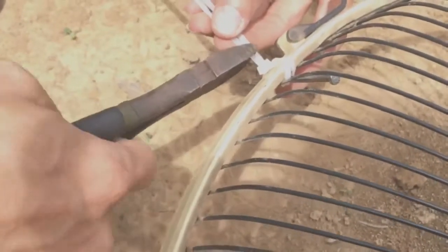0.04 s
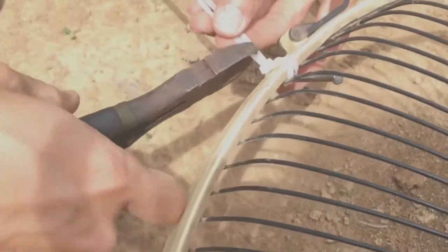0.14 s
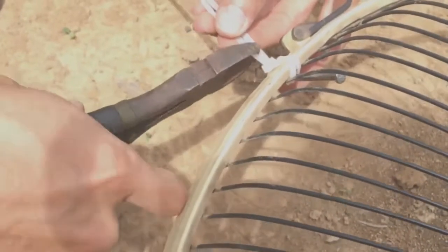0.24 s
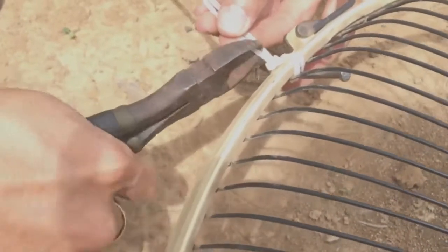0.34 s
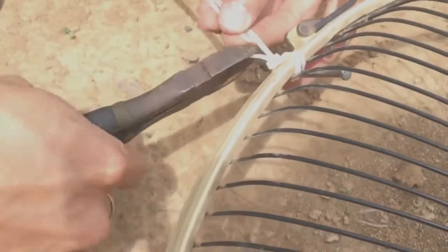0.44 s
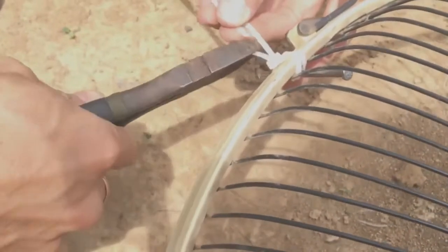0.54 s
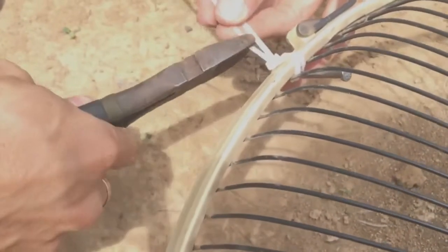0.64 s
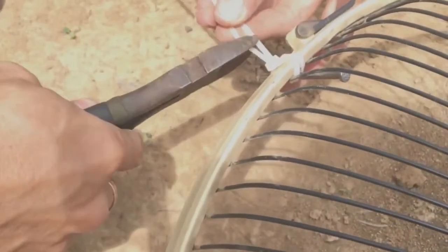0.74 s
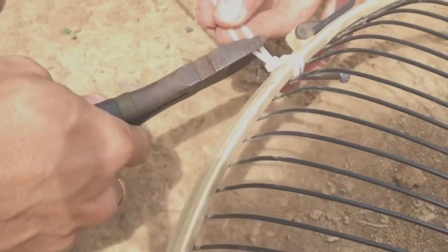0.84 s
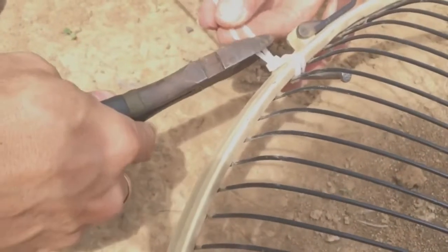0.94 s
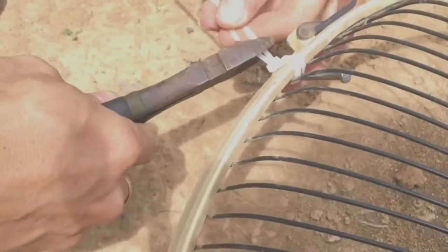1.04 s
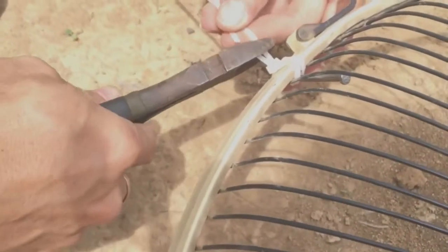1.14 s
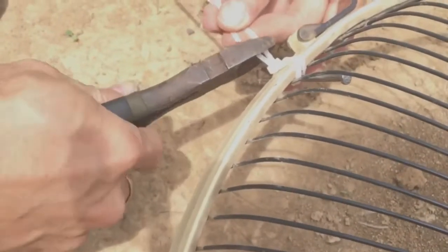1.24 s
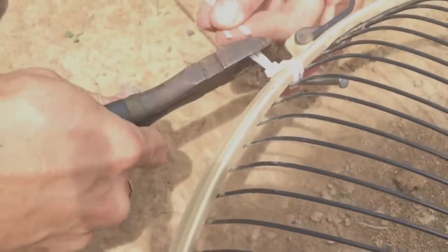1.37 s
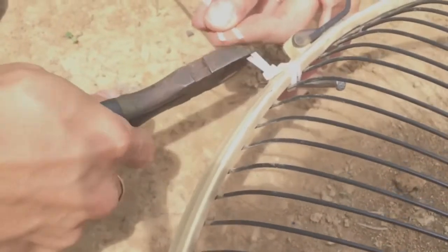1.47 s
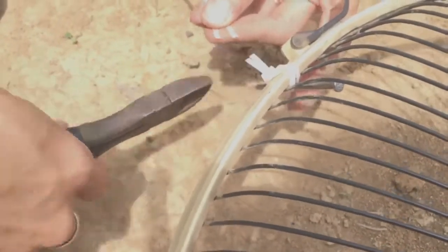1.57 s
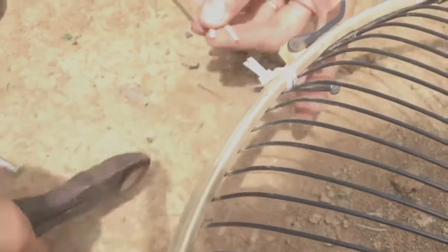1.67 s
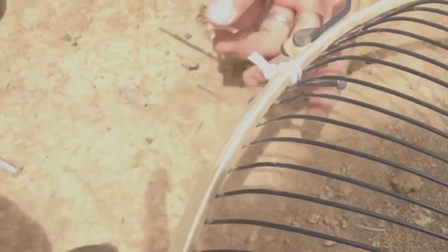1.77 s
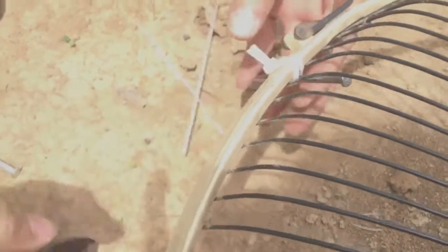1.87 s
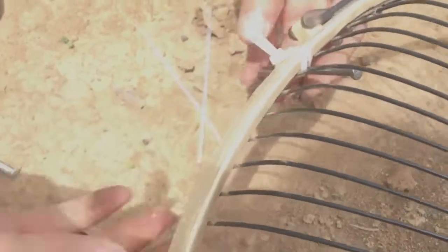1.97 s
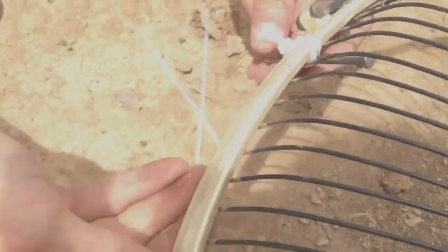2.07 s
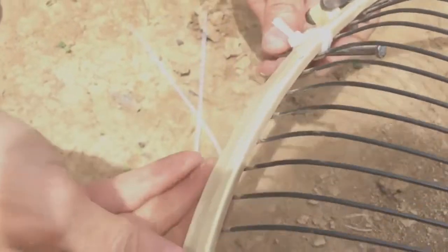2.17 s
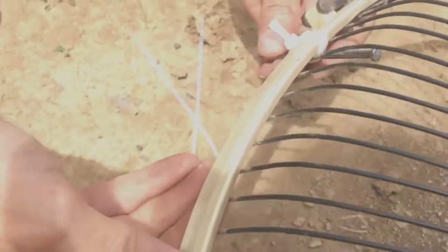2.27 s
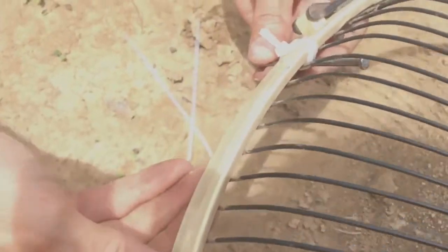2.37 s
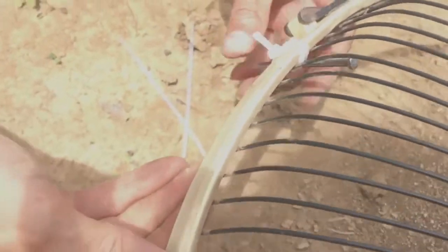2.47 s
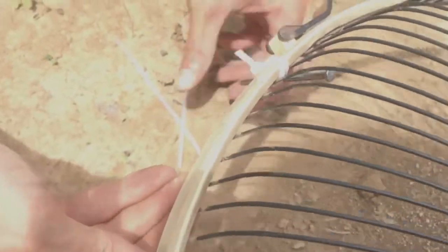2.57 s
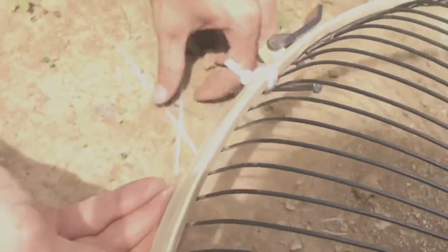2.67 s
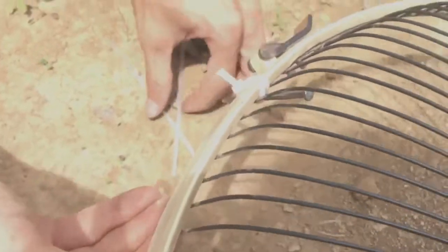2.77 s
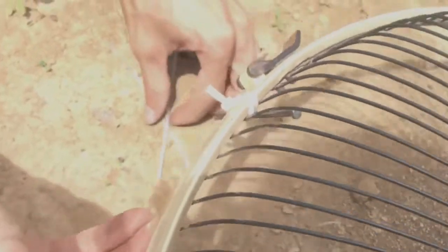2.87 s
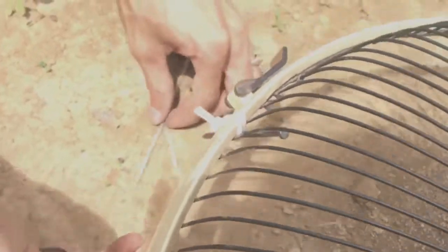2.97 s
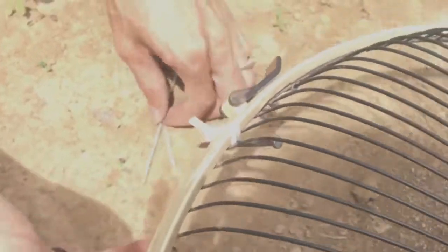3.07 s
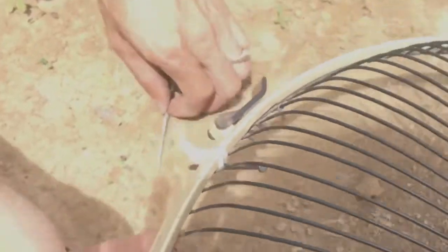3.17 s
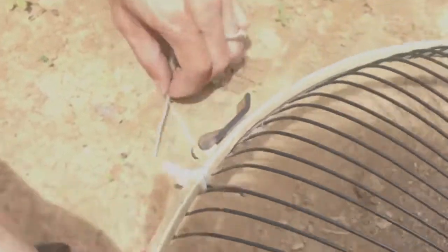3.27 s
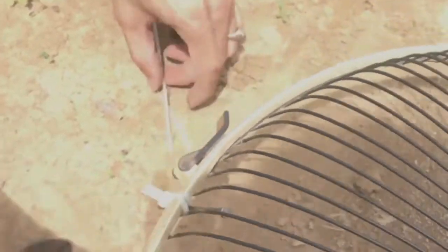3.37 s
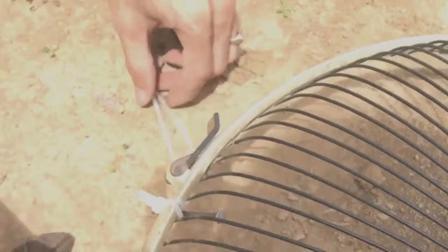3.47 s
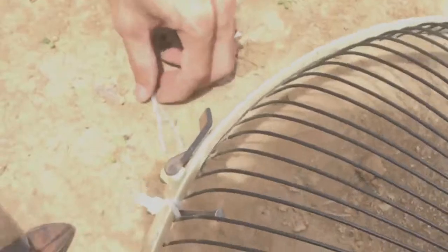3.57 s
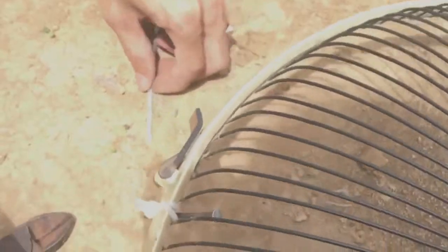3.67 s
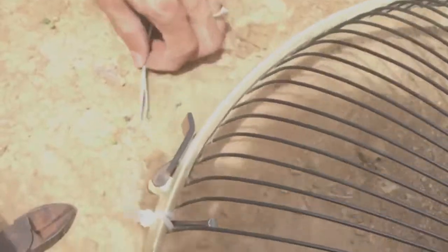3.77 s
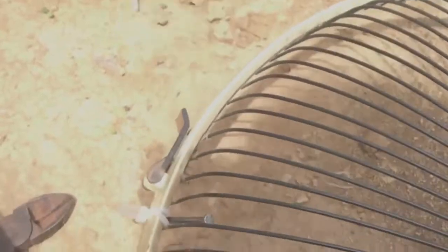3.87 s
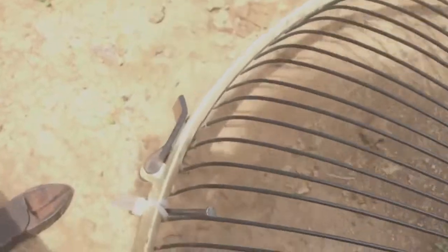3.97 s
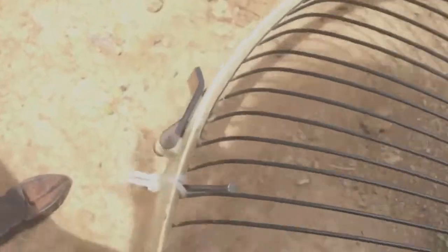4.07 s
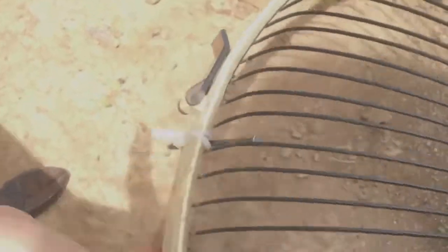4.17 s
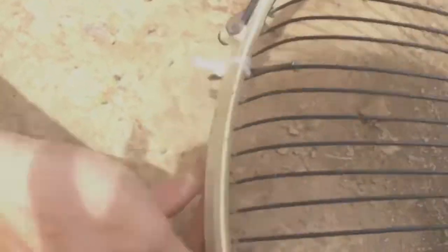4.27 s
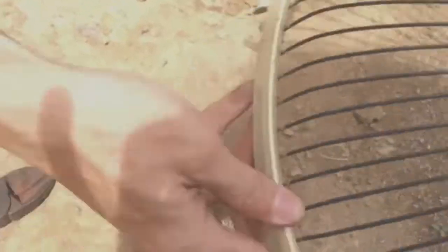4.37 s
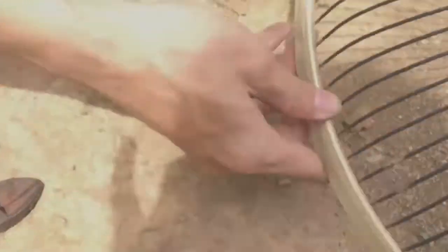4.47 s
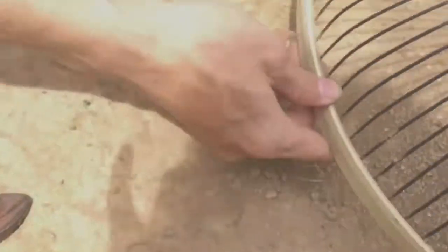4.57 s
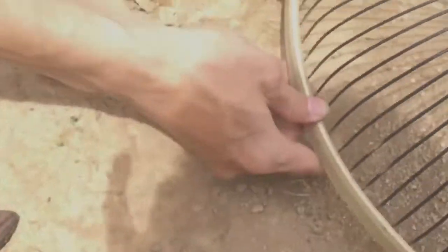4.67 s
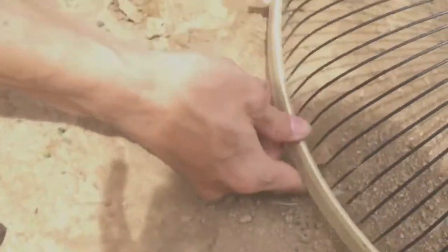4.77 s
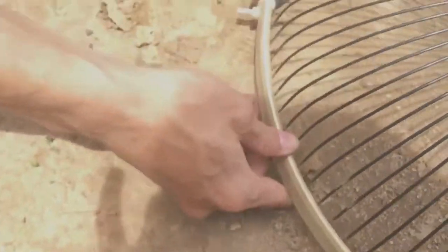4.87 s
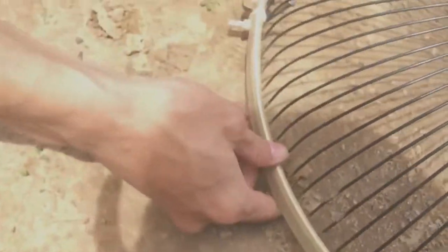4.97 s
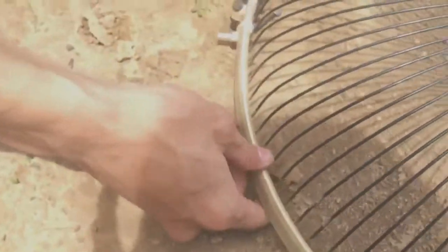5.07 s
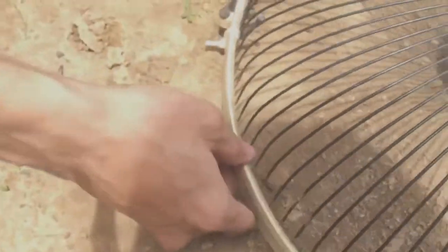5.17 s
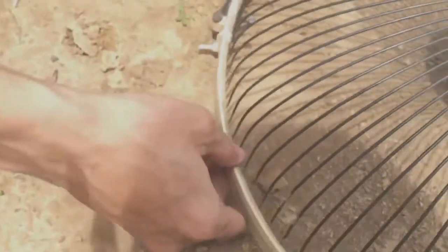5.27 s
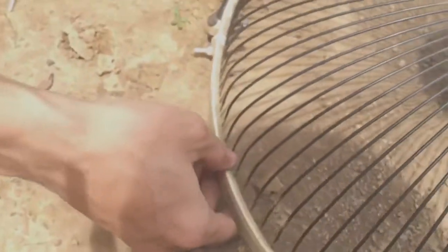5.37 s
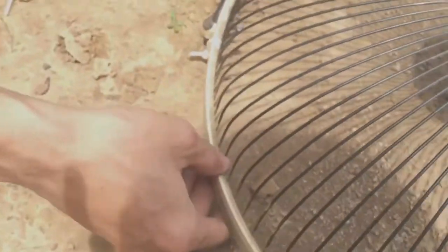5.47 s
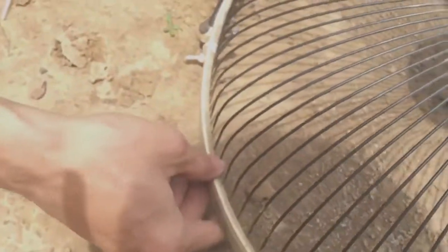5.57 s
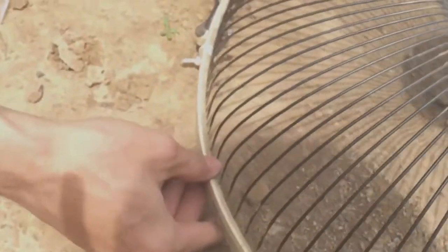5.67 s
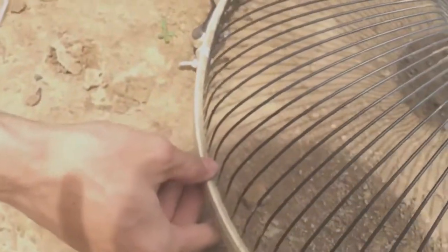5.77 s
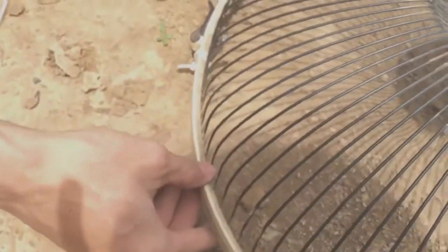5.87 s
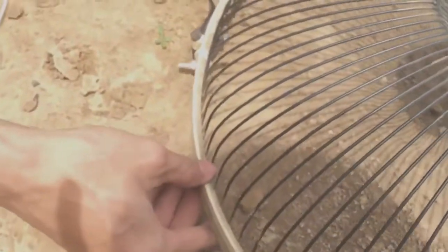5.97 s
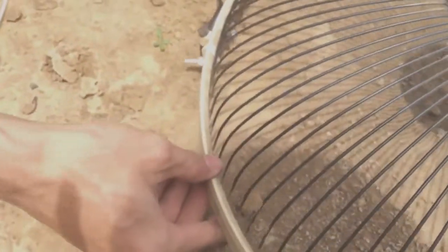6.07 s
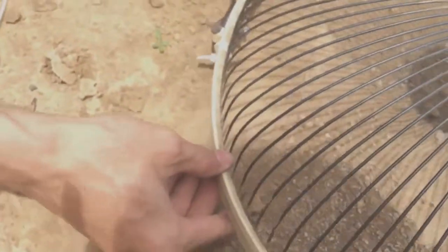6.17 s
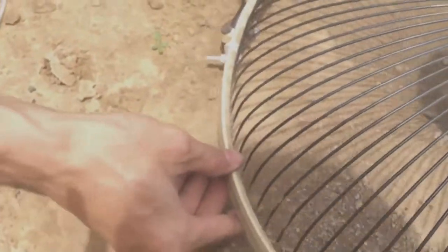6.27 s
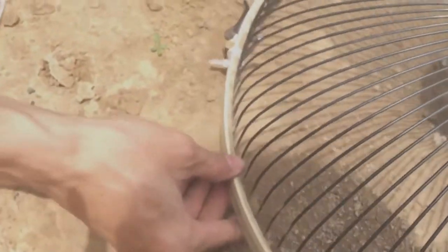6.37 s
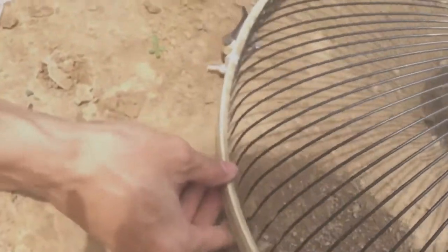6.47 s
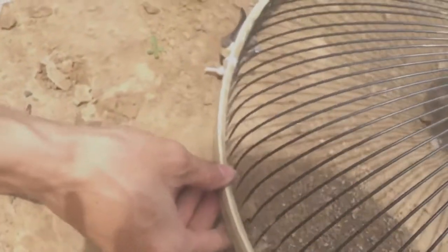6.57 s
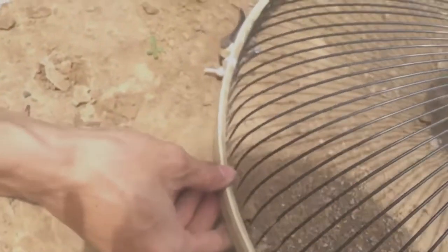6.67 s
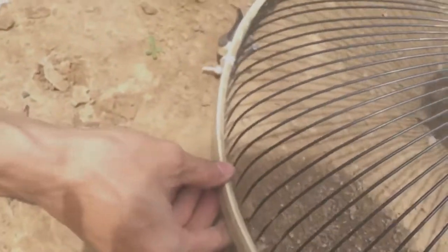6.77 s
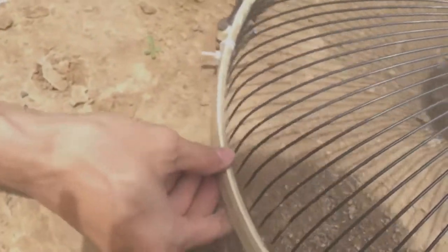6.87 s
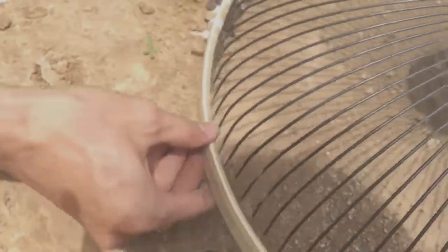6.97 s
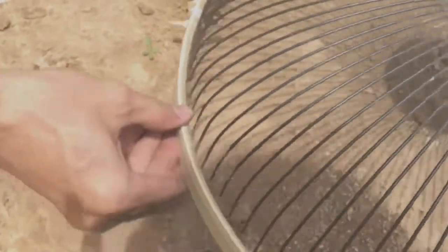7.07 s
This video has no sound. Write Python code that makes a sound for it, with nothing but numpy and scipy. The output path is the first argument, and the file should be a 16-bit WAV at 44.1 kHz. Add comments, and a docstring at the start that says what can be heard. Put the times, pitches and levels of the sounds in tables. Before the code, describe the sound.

Two sharp, bright snips of side cutters through plastic ties, then the tool clacks onto dry earth and a wire guard drags grittily.

```python
"""A soft scuff and rustle, then a sharp crack: side cutters snip two cable-tie tails on a wire fan guard.
The guard lies on dry earth near the microphone. Cracks are shaped noise bursts; steel and wires are fading sine waves.
The cutters drop with clacks and thuds, fingers gather the tails, and the guard is dragged round as gritty noise.
Behind it, coloured noise makes a steady low outdoor rumble, with a faint whine and a few blurred bird notes."""
import sys
import numpy as np
from scipy import signal
from scipy.fft import rfft, irfft, next_fast_len
from scipy.io import wavfile
from scipy.ndimage import uniform_filter1d

SR = 44100
rng = np.random.default_rng(int(sys.argv[2]) if len(sys.argv) > 2 else 0)


def store_wav(level_fs):
    """Save 16-bit WAV to argv[1]."""
    pcm = np.round(np.clip(np.atleast_2d(level_fs), -1, 1) * 32767)
    wavfile.write(sys.argv[1], SR, pcm.T.astype(np.int16))


N = 313992
T = np.arange(N) / SR  # time in seconds

# In all tables, t60_s is the time in seconds to fade by 60 dB.
# The two cuts: start_s, crack_db, cutter_ring_db, jaw_delay_s, jaw_clash_db, thump_db, thump_hz,
# low_guard_ring_db, high_guard_ring_db
CUTS = [(0.3618, -3, -12.5, .0026, -14, -14.5, 67.9, -59.5, -51),
        (1.4212, -3.5, -16.5, 0.0023, -16, -25, 149.4, -44, -53)]
# Colour of the cracking plastic: pitch_hz, first_cut_db, second_cut_db
CRACK_COLOUR = [(200, -23, -14), (690, -27, -25.5), (1191, -10, -4), (2100, -4, 0), (2996, -14, -13),
                (3800, -1.5, -3.5), (4900, -13.5, -12), (6000, -3.5, -8), (7390, -0.5, -5.5), (9160, 6, 3),
                (10600, -6.5, -10), (12600, -0.5, -1), (15500, -7, -12), (17050, -18.5, -25.5)]
# Ringing tones of the steel cutters: pitch_hz, t60_s, first_cut_db, second_cut_db
CUTTER_TONES = [(1120, .018, -26.5, -7), (1400, 0.023, -7.5, -13), (1980, .026, -17, 1),
                (2203, .03, -7.5, 1.5), (2500, 0.035, -24.5, -12.5), (3670, 0.026, -3.5, -12),
                (3929, .024, -20, -1), (4180, 0.03, -19.5, -7.5), (5500, 0.026, -9, -11.5),
                (5970, 0.025, -11, -5.5), (6514, 0.022, -12.5, -11.5), (6800, .022, -19.5, -7),
                (7630, 0.017, -11, -13.5), (7850, 0.022, -11.5, -12.5), (8260, .022, -13, -6),
                (8890, 0.015, 4.5, -4.5), (9334, .02, -11.5, -4), (10300, .02, -6.5, -5),
                (10130, 0.024, -11, -8), (11320, .022, -13.5, -14.5), (12404, .018, -11.5, -5),
                (13020, .022, -25, -0.5), (14200, .02, -20.5, -11.5), (15500, .02, -16, -13)]
# Ringing tones of the wire guard when no hand holds it: pitch_hz, level_db, t60_s
GUARD_TONES = [(356, -14.5, 0.84), (987, 0, .36), (1046, 0, 0.37), (1085, -3.5, 0.55), (1210, -6, .2),
               (1340, -9.5, .15), (1864, -6.5, 0.42), (1990, -9, 0.45), (3237, -14, 0.43),
               (3730, -4.5, .25), (3910, -2, 0.45), (4000, -5, 0.87), (4067, -8, 0.7), (5230, -6.5, 0.36),
               (5380, -4.5, 0.23), (5950, -9, 0.29), (6500, -10.5, .3), (7854, -10.5, .35), (8200, -9, .4),
               (8500, -10.5, .35), (8975, -12, 0.34), (9660, -14.5, .35)]
WIRE_SPREAD = .009  # relative spread of pitch between nearly equal wires
HELD_DECAY = .33  # share of the ringing time left when a hand holds the guard

# The loose jaws chinking as the cutters leave the hand: pitch_hz, level_db, t60_s
CHINK_TONES = [(2800, -61, 0.27), (5400, -65, .12), (7090, -66, .2)]
CHINK_S = 1.846
# The cutters landing: start_s, clack_db, thud_db, thud_hz, thud_t60_s
LANDINGS = [(1.9107, -22.5, -14.5, 167, 0.056), (2.0154, -47.5, -15, 186.5, 0.067)]
# Colour of steel clacking on earth: pitch_hz, level_db
CLACK_COLOUR = [(300, -6), (700, -4.5), (1350, -2.5), (1800, -3.5), (2230, 4), (2750, -2), (3250, -15),
                (3600, -9), (4300, -25), (5500, -15), (7100, -16), (9000, -28), (16000, -33)]
REBOUND_S, REBOUND_DB = .0045, -12  # the steel head touches down a second time

# Small ticks of plastic, steel and grit: start_s, level_db, t60_s, brightness_db_per_octave, guard_ring_db
SMALL_TICKS = [(.041, -60, .05, 1, -20), (0.189, -53, 0.045, -4.5, -13), (0.3383, -37.5, 0.02, 9.5, -21.5),
               (0.4767, -33.5, 0.015, 7.5, -18), (.478, -43.5, 0.059, -2.5, -16),
               (.532, -53.5, 0.039, -3, -13), (0.901, -48, 0.034, -2, -15.5), (1.05, -57.5, 0.034, 1, -16),
               (1.1711, -53, 0.035, -3.5, -20), (1.4085, -48, .016, 6.5, -20),
               (1.8455, -46, 0.029, 0.5, -20), (1.867, -51, .02, 8, -20), (1.9615, -46, 0.028, -7, -20),
               (2.0245, -48.5, .025, 8, -20), (2.1, -57, .05, 4.5, -16), (2.131, -60, .05, 1, -16),
               (2.213, -57.5, .06, 1, -11), (2.42, -52.5, .02, 4, -8), (2.436, -52.5, 0.048, 0, -5.5),
               (2.449, -50, 0.023, -0.5, -12), (2.641, -49.5, .04, 2, -10), (2.656, -46, .05, -9.5, -16),
               (2.989, -52.5, .04, 3.5, -16), (3.135, -58.5, 0.11, 2.5, -18), (4.68, -54, 0.043, 6.5, -16),
               (5.961, -57, 0.045, -2, -16)]
# Colour of the ticks: pitch_hz, level_db
TICK_COLOUR = [(300, -19), (1000, -4), (2000, 4.5), (3000, -1.5), (4000, 1), (8000, -7.5), (16000, -8)]

# Pulls that drag the guard: start_s, up_to_speed_s, slowing_s, end_s, grit_db, ringing_wires_db
DRAG_PULLS = [(3.324, 3.62, 3.778, 3.93, -49, -73), (3.937, 4.365, 4.385, 4.47, -44.5, -64)]
SPEED_POWER = 1.23  # curves the rise and fall of each pull
# Colour of the rim on grit: pitch_hz, level_db
GRIT_COLOUR = [(180, -43), (300, -32), (360, -7), (418, -23), (462, -13.5), (853, -18.5), (1060, -5),
               (1550, -14), (1950, -8), (2750, -19), (3550, -8.5), (4950, -16.5), (5740, -13),
               (7620, -17.5), (9700, -17), (15800, -20)]
# The rim catching on stones: start_s, level_db
STONE_CATCHES = [(3.757, -47), (4.116, -44), (4.168, -55), (4.214, -46.5), (4.324, -38), (4.353, -35.5),
                 (4.381, -51), (4.443, -46.5)]
CATCH_RISE_S, CATCH_T60_S = 0.0018, 0.1
# The rim digging in and ringing the wires: start_s, length_s, level_db
RIM_DIGS = [(4.195, 0.037, -42), (4.252, 0.16, -42), (7.071, .05, -59)]
DIG_ATTACK_S, DIG_T60_S = 0.023, 0.14
DIG_SWELL_DB, DIG_EARTH_DB = 7.5, -8.5  # the rim bites deeper as it goes; level of the earth against the wires

# Strokes of hands and sleeves: start_s, length_s, level_db, brightness_db_per_octave
HAND_STROKES = [(0.019, 0.058, -64, -1.5), (0.127, 0.037, -62.5, 0.5), (0.207, 0.042, -54, -2.5),
                (.49, 0.24, -60, -2), (.8, 0.29, -71.5, -2), (1.22, 0.25, -65, -3.5),
                (1.522, 0.33, -60.5, -2), (1.91, 0.11, -62.5, -1.5), (2.067, 0.13, -63.5, -3.5),
                (2.197, 0.033, -60, -0.5), (2.397, 0.046, -68.5, -1), (2.536, 0.11, -64, -1),
                (2.83, 0.21, -65.5, 2), (3.028, 0.2, -65.5, 0), (3.258, 0.047, -61.5, -0.5),
                (3.879, 0.132, -66.5, -1), (4.458, 0.043, -58, 0), (4.56, 0.18, -63.5, 2.5),
                (4.738, 0.14, -71, 3), (4.87, 0.15, -63, 3.5), (5.019, 0.44, -71.5, 1.5),
                (5.678, 0.39, -72, -2), (6.47, 0.25, -66.5, 2.5)]
# Colour of skin and cloth rubbing: pitch_hz, level_db
RUB_COLOUR = [(500, -6), (1200, 9.5), (2500, -1.5), (4000, 4), (6000, -2), (9000, 0), (10500, -4.5),
              (13000, 0), (16000, -2)]
RUB_ATTACK_S, RUB_SWELL_DB, RUB_T60_S = 0.018, 1.5, 0.22  # each stroke presses harder as it goes, then lets go

# Fingers and shoes scuffing the dry earth: start_s, length_s, level_db
EARTH_SCUFFS = [(0.01, 0.18, -57), (0.178, 0.087, -60.5), (2.628, 0.11, -56.5), (4.43, 0.08, -63)]
# Colour of crumbling earth: pitch_hz, level_db
EARTH_COLOUR = [(300, -2), (850, 7.5), (1150, 5), (1900, -3), (2800, -29), (8000, -25)]

# Far birds, each note bending to a turning pitch and part way back:
# start_s, length_s, start_hz, turning_hz, level_db, blur_width_hz
BIRD_NOTES = [(3.23, 0.18, 8080, 8180, -72.5, 382), (5.296, 0.14, 8300, 8150, -71.5, 387),
              (5.347, 0.13, 2800, 2610, -68, 350), (5.39, 0.27, 1600, 1453, -63.5, 320),
              (5.42, .11, 7700, 7450, -78.5, 380), (5.501, 0.15, 7700, 8050, -71.5, 385),
              (5.7, .13, 7600, 7700, -80, 376), (5.856, 0.16, 3750, 4060, -70.5, 110),
              (5.87, 0.1, 8300, 8140, -79, 380), (5.98, .11, 7600, 7340, -80, 380),
              (6.1, 0.18, 8000, 8100, -79, 380), (6.26, 0.11, 7500, 7550, -80.5, 380),
              (6.351, .13, 7900, 8150, -78.5, 380), (7.052, 0.2, 8050, 8080, -70.5, 300)]

# Colour of the outdoor rumble and wash: pitch_hz, level_db
AIR_COLOUR = [(20, -45), (27, -21), (33, -8), (40, 0), (50, 2.5), (62, -3.5), (80, 0.5), (100, -6),
              (118, -0.5), (145, -10.5), (195, -11), (280, -18.5), (420, -27), (900, -29.5), (1500, -33),
              (2300, -39), (3200, -49.5), (6000, -53), (16000, -56.5)]
AIR_DB = -43.5
# A faint far whine, before its wavering: starting pitch, slow rise and lowest level
WHINE_HZ, WHINE_RISE_HZ_PER_S, WHINE_DB = 465, 2.6, -79.5
# The whine swelling on the air: start_s, length_s, level_db
WHINE_RISES = [(3.05, 0.44, -76.5), (4.599, .65, -73), (5.88, 0.48, -66.5)]
TOP_HZ = 15900  # highest pitch let through


def snips():
    """The strap parts with a crack, the jaws clash just after, the jolt thumps and rings the guard."""
    out = np.zeros(N)
    lead = 1 / 50  # seconds kept ahead of the crack for the faint swell
    t = T[:SR] - lead
    cutter_hz, cutter_t60, *cutter_levels = np.transpose(CUTTER_TONES)
    guard_hz, guard_db, guard_t60 = np.transpose(GUARD_TONES)
    crack_hz, *crack_levels = np.transpose(CRACK_COLOUR)
    for cut, cutter_db, colour_db in zip(CUTS, cutter_levels, crack_levels):
        start, crack_db, ring_db, delay, jaw_db, thump_db, thump_hz, low_db, high_db = cut
        # a very faint noise swells for a few milliseconds into the crack
        swell_in = undb(-30) * fade(-t, 0.0088)
        fracture = undb(crack_db) * (t >= 0) * np.exp(-(t / 0.00088) ** 2)
        clash = undb(jaw_db) * (fade(t - delay, 0.013) + .7 * fade(t, 0.015))
        # the ground and things nearby scatter a little back
        scatter = undb(-38) * fade(t, 0.12)
        crack_colour = np.c_[crack_hz, colour_db]
        crack = burst(fracture, crack_colour) + burst(swell_in + clash + scatter, crack_colour)
        long_tail = noise(TICK_COLOUR, size=SR) * undb(-56.0) * fade(t, 0.79)
        steel = ring(t, cutter_hz, cutter_db + ring_db, cutter_t60) * (1 - fade(t, .002))
        wire_db = guard_db + np.where(guard_hz < 2500, low_db, high_db)
        guard = chorus(t, guard_hz, wire_db, guard_t60)
        jolt = -thud(t, thump_hz, 0.043, 0.0025)
        jolt += 0.99 * thud(t, 250, 0.014, 0.00064)
        jolt += .3 * thud(t, 480, 0.0097, .0004)
        add(out, start - lead, crack + long_tail + steel + guard + undb(thump_db) * jolt)
    return out


def drops():
    """The jaws chink, the steel head clacks on hard earth; head and handles each land with a thud."""
    out = np.zeros(N)
    lead = 1 / 50
    t = T[:SR // 4] - lead  # time from the impact
    add(out, CHINK_S - lead, ring(t, *np.transpose(CHINK_TONES)))
    for start, clack_db, thud_db, hz, t60 in LANDINGS:
        impact = fade(t, 0.015)
        rebound = undb(REBOUND_DB) * fade(t - REBOUND_S, 0.016)
        tail = undb(-42) * fade(t, 0.13)
        clack = undb(clack_db) * burst(impact + rebound + tail, CLACK_COLOUR)
        add(out, start - lead, clack + undb(thud_db) * thud(t, hz, t60, 0.0067))
    return out


def drag():
    """The rim grinds unevenly over fine grit, catches on stones, digs into the earth and sets the wires ringing."""
    force = unit(grains(share=.6, spread_db=1.2) * undb(1.3 * walk(70)))
    sliding, ringing = 0, 0
    for *times, grit_db, wires_db in DRAG_PULLS:
        strength = pull(*times)
        sliding = sliding + undb(grit_db) * strength
        ringing = ringing + undb(wires_db) * strength
    catches = sum(undb(db) * stroke(T - start, CATCH_RISE_S, CATCH_RISE_S, CATCH_T60_S)
                  for start, db in STONE_CATCHES)
    digs = sum(undb(db) * stroke(T - start, length, DIG_ATTACK_S, DIG_T60_S, DIG_SWELL_DB)
               for start, length, db in RIM_DIGS)
    grinding = shifting(force, depth_db=2.2)
    grit = colour(grinding, GRIT_COLOUR) * np.hypot(sliding, catches)
    crumbs = colour(force, EARTH_COLOUR) * digs * undb(DIG_EARTH_DB)
    wire_ring = wires(force) * np.hypot(ringing, digs)
    return grit + undb(-21) * sympathy(grit) + crumbs + wire_ring


def ticks():
    """Jaws biting, offcuts landing and fingertips on grit and wires: short noise ticks that ring the guard."""
    out, touched = np.zeros(N), np.zeros(N)
    t = T[:SR // 4]
    for start, db, t60, tilt_db, guard_db in SMALL_TICKS:
        tick = undb(db) * noise(TICK_COLOUR, size=len(t), tilt_db=tilt_db) * fade(t, t60)
        add(out, start, tick)
        add(touched, start, undb(guard_db) * tick)
    return out + sympathy(touched)


def hands():
    """Skin and cloth rub on the guard in small uneven slips, with a fine crackle."""
    out = np.zeros(N)
    for start, length, db, tilt_db in HAND_STROKES:
        t = T[:next_fast_len(int((length + RUB_T60_S) * SR))]
        crackle = grains(share=.2, spread_db=2, size=len(t))
        slips = shifting(crackle, depth_db=2.5) * undb(1.8 * walk(55, size=len(t)))
        pressure = stroke(t, length, RUB_ATTACK_S, RUB_T60_S, RUB_SWELL_DB)
        add(out, start, undb(db) * colour(slips, RUB_COLOUR, tilt_db) * pressure)
    return out


def scuffs():
    """Short dull swells of crumbling earth, made of many tiny impacts."""
    pressure = sum(undb(db) * arch(start, length) for start, length, db in EARTH_SCUFFS)
    return colour(grains(share=0.063, spread_db=3.5), EARTH_COLOUR) * pressure


def birds():
    """Thin notes with a curving pitch, blurred by distance."""
    out = np.zeros(N)
    for start, length, start_hz, turning_hz, db, width_hz in BIRD_NOTES:
        along = np.linspace(0, 1, int(length * SR))
        hz = turning_hz + (start_hz - turning_hz) * (1 - 1.6 * along) ** 2
        blur = walk(2 * width_hz, size=len(along)) + 1j * walk(2 * width_hz, size=len(along))
        note = np.real(blur * np.exp(2j * np.pi * np.cumsum(hz) / SR))
        add(out, start, undb(db) * np.sin(np.pi * along) * note)
    return out


def outdoors():
    """Steady low rumble, like distant engines, with a thin wash and a wavering whine above it."""
    whine_hz = (WHINE_HZ + WHINE_RISE_HZ_PER_S * T) * (1 + .012 * walk(25))
    turns = np.cumsum(whine_hz) / SR
    swells = sum(undb(db) * arch(start, length) for start, length, db in WHINE_RISES)
    loudness = undb(WHINE_DB) + swells
    whine = unit(np.sin(2 * np.pi * turns)) * loudness * undb(2.0 * walk(12))
    wash = colour(shifting(rng.standard_normal(N), depth_db=1.4), AIR_COLOUR)
    return wash * undb(AIR_DB + .5 * walk(0.85)) + whine


def wires(force):
    """The guard rung by a running force; the gripping hand damps it, the high tones most. Rms 1."""
    hz, db, t60 = np.transpose(GUARD_TONES)
    damping_db = 14 * np.log2(np.maximum(hz / 1300, 1))
    response = chorus(T[:SR // 2], hz, db - damping_db, t60 * HELD_DECAY)
    return unit(signal.fftconvolve(force, response)[:N])


def sympathy(x):
    """The upper wire tones, set ringing by whatever touches the guard; the hand shortens their decay."""
    hz, db, t60 = np.transpose([tone for tone in GUARD_TONES if tone[0] > 3000])
    response = chorus(T[:SR], hz, db, t60 * HELD_DECAY)
    return signal.fftconvolve(x, response / np.linalg.norm(response))[:N]


def chorus(t, hz, db, t60, count=3):
    """Each tone is shared by several nearly equal wires that beat against each other."""
    detune = 1 + WIRE_SPREAD * rng.standard_normal((count, len(hz)))
    return sum((-1) ** k * ring(t, hz * d, db, t60) for k, d in enumerate(detune)) / np.sqrt(count)


def ring(t, hz, db, t60):
    """Sum of fading tones, each followed until it has died away; neighbours swing in opposite directions."""
    out = np.zeros(len(t))
    for k, (f, d, life) in enumerate(zip(hz, db, t60)):
        alive = t[:np.searchsorted(t, 2 * life)]
        out[:len(alive)] += (-1) ** k * undb(d) * np.sin(2 * np.pi * f * alive) * fade(alive, life)
    return out


def thud(t, hz, t60, rise):
    """A soft, heavily damped low swing."""
    return np.sin(2 * np.pi * hz * t) * fade(t, t60) * (1 - np.exp(-(t / rise) ** 2))


def burst(envelope, points):
    """A short burst: noise under the envelope, evened out and coloured without blurring its sharp edge."""
    size = len(envelope)
    spectrum = rfft(rng.standard_normal(size) * envelope)
    power = uniform_filter1d(np.abs(spectrum) ** 2, size=size // 60)
    # folding the cepstrum gives a causal filter, which keeps the edge sharp
    cepstrum = irfft(np.log(gains(points, size) / np.sqrt(power)), size)
    causal = np.exp(rfft(cepstrum * (1 + np.sign(np.fft.fftfreq(size)))))
    return unit(irfft(spectrum * causal, size)) * np.sqrt(np.mean(envelope ** 2))


def grains(share, spread_db, size=N):
    """Dense tiny impacts of unequal size, on a given share of the samples."""
    sizes = undb(spread_db * np.minimum(rng.exponential(size=size), 4))
    return rng.standard_normal(size) * (rng.random(size) < share) * sizes


def shifting(x, depth_db):
    """Narrow bands swell and fade on their own, as when points of contact keep changing."""
    bands = signal.stft(x)[2]
    swell = uniform_filter1d(rng.standard_normal(bands.shape), size=5, axis=0)  # across pitch
    swell = uniform_filter1d(swell, size=9, axis=1)  # across time
    return unit(signal.istft(bands * undb(depth_db * unit(swell)))[1][:len(x)])


def pull(start, up_to_speed, slowing, end):
    """Strength of the scraping as the guard gathers speed, slides and comes to rest."""
    return np.interp(T, [start, up_to_speed, slowing, end], [0, 1, 1, 0]) ** SPEED_POWER


def stroke(t, length, attack, t60, swell_db=0):
    """Attack at t = 0, a hold that swells up to gain 1, and release."""
    along = np.clip(t / length, 0, 1)
    release = fade(np.maximum(t - length, 0), t60)
    return np.clip(t / attack, 0, 1) * undb(swell_db * (along - 1)) * release


def arch(start, length):
    """A smooth swell from 0 to 1 and back."""
    return np.sin(np.pi * np.clip((T - start) / length, 0, 1))


def fade(t, t60):
    """Exponential decay that starts at t = 0 and drops 60 dB in t60 seconds."""
    return (t >= 0) * np.exp(-np.log(1000) * np.maximum(t, 0) / t60)


def walk(rate, size=N):
    """Smooth random wander of rms 1, with about `rate` new values a second."""
    k = max(int(SR / rate), 1)
    steps = np.repeat(rng.standard_normal(size // k + 1), k)
    return unit(uniform_filter1d(steps, k)[:size])


def noise(points, size=N, tilt_db=0):
    """Coloured noise of rms 1."""
    return colour(rng.standard_normal(size), points, tilt_db)


def colour(x, points, tilt_db=0):
    """Shape a signal by (Hz, dB) points and a tilt per octave; rms 1."""
    return unit(irfft(rfft(x) * gains(points, len(x), tilt_db), len(x)))


def gains(points, size, tilt_db=0):
    """Gain at each frequency from (Hz, dB) points and a tilt per octave."""
    octave = np.log2(np.maximum(np.fft.rfftfreq(size, 1 / SR), 1))
    hz, db = np.transpose(points)
    tilt = tilt_db * np.maximum(octave, np.log2(hz[0]))
    return undb(np.interp(octave, np.log2(hz), db) + tilt)


def undb(db):
    """Decibels to gain."""
    return 10 ** (np.asarray(db) / 20)


def unit(x):
    """Scale to rms 1."""
    return x / np.sqrt(np.mean(x ** 2))


def add(out, start, x):
    """Mix x in from the start time in seconds."""
    i = int(start * SR)
    out[i:i + len(x)] += x[:N - i]


def scene():
    """All sources at one microphone."""
    return (snips() + drops() + ticks() + drag() + hands() + scuffs() + birds() + outdoors())[None]


def record(dry):
    """The microphone rounds the loudest peaks; a steep filter cuts the top."""
    rounded = .88 * np.tanh(dry / .88)
    low_pass = signal.ellip(8, .2, 70, TOP_HZ, fs=SR, output="sos")
    return signal.sosfilt(low_pass, rounded)


dry = scene()
out = record(dry)
store_wav(out)
```